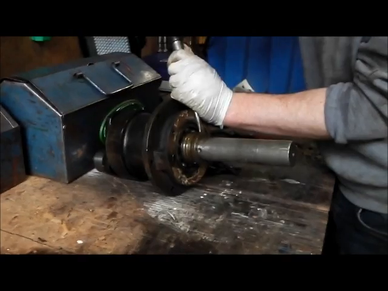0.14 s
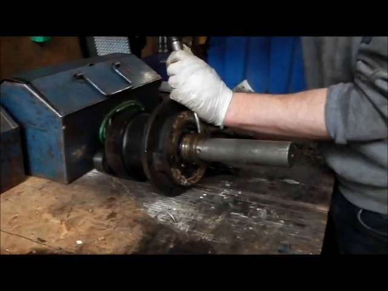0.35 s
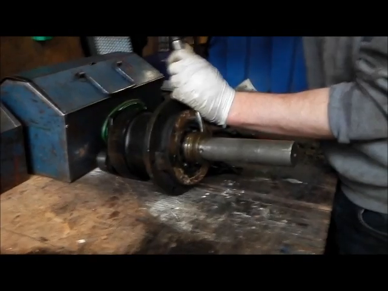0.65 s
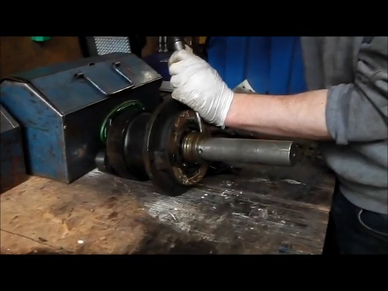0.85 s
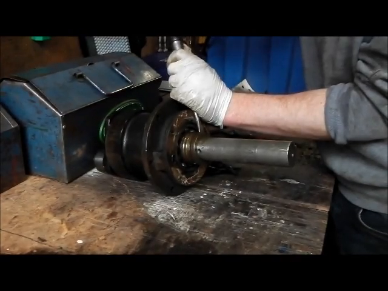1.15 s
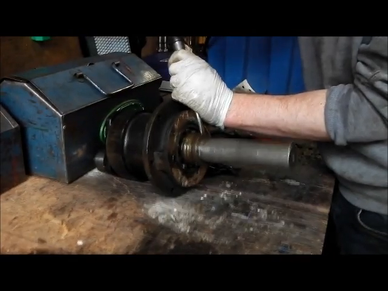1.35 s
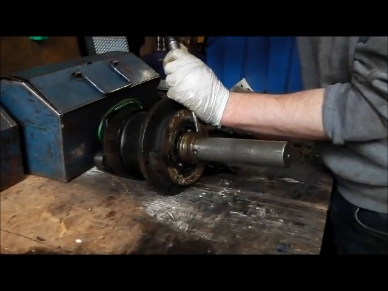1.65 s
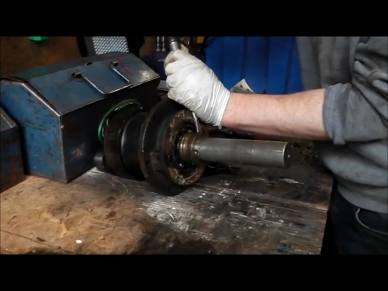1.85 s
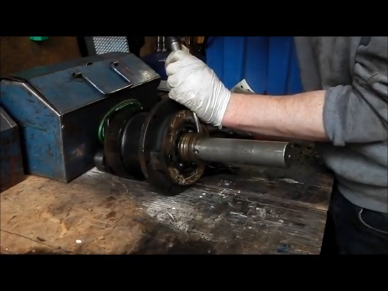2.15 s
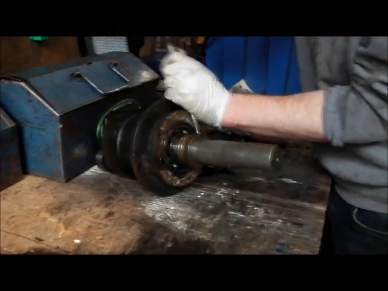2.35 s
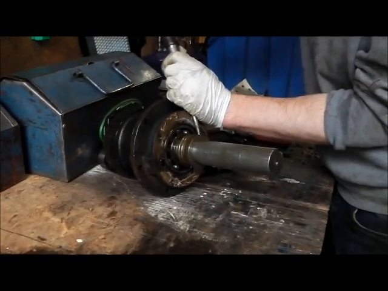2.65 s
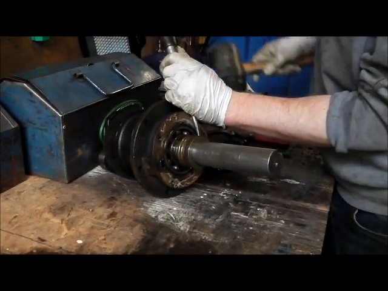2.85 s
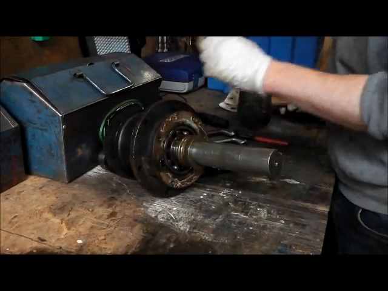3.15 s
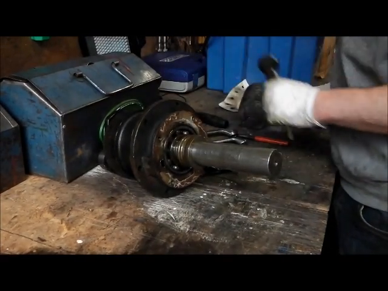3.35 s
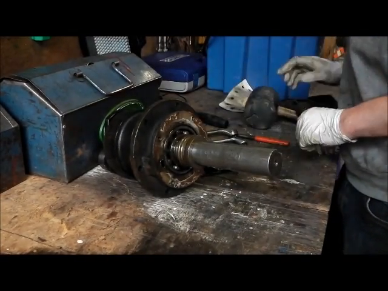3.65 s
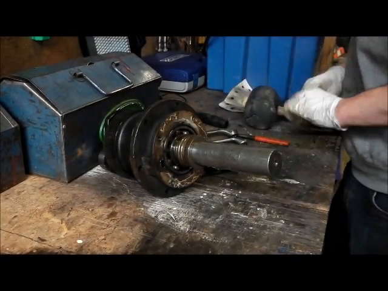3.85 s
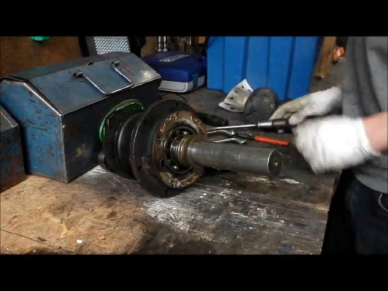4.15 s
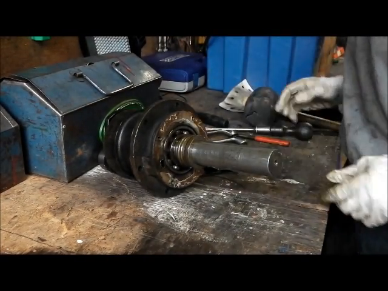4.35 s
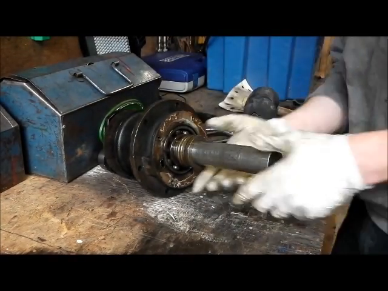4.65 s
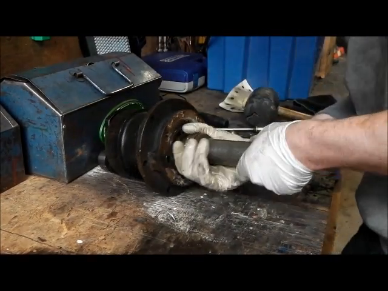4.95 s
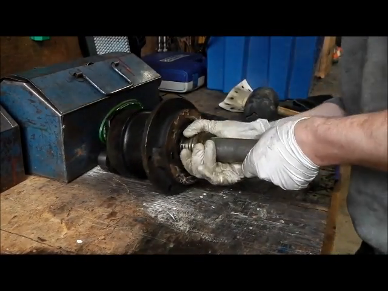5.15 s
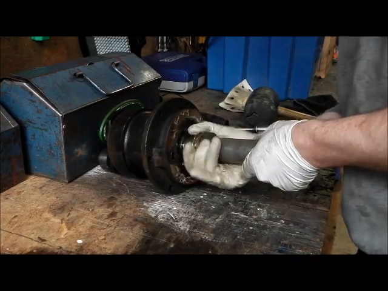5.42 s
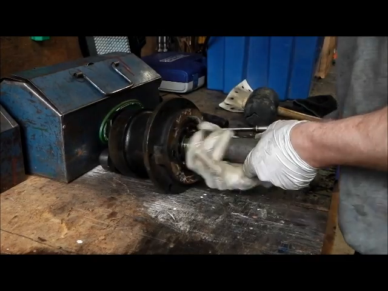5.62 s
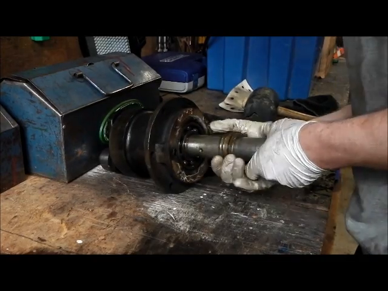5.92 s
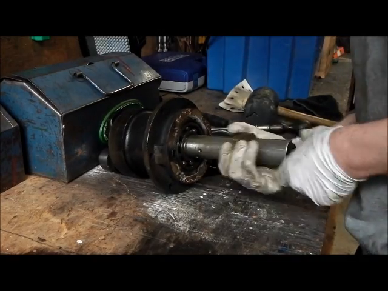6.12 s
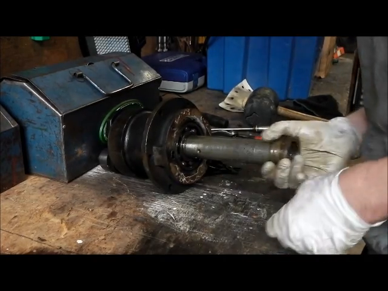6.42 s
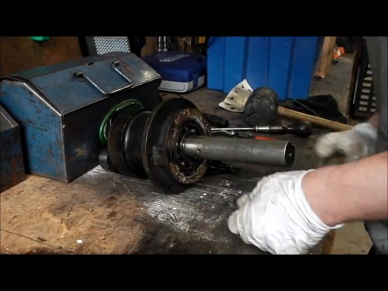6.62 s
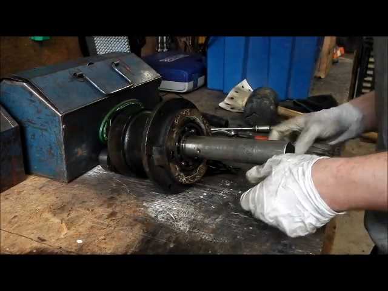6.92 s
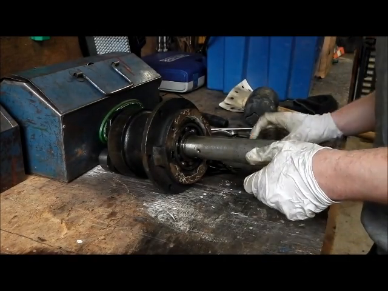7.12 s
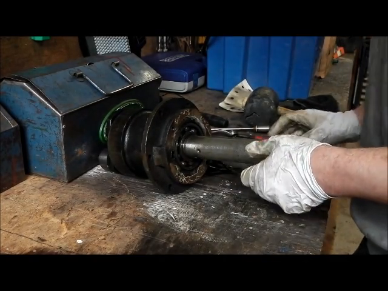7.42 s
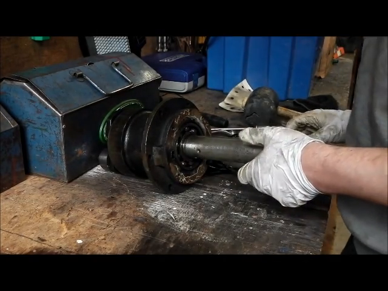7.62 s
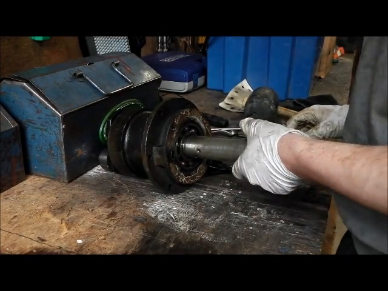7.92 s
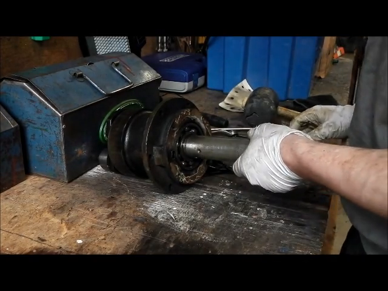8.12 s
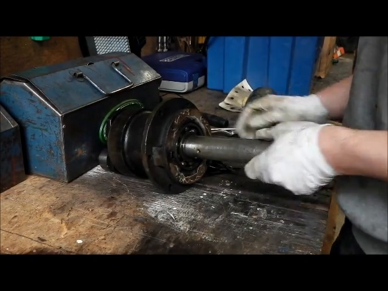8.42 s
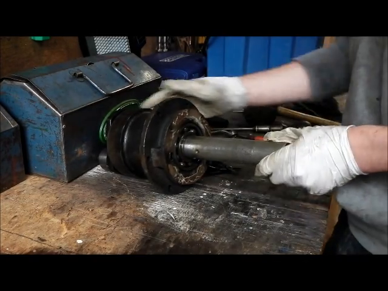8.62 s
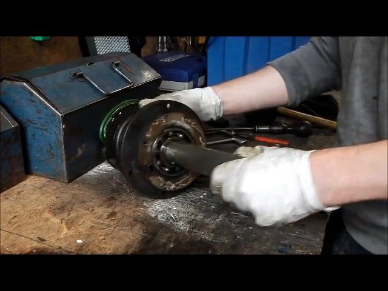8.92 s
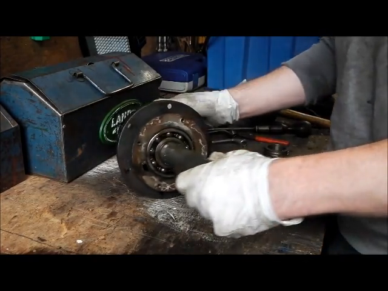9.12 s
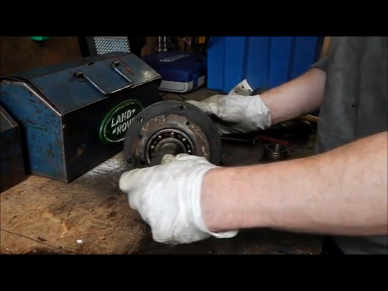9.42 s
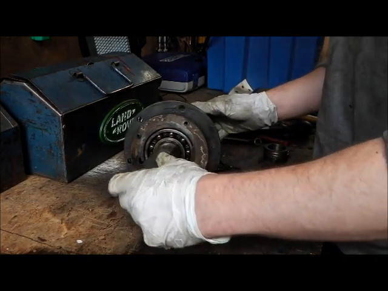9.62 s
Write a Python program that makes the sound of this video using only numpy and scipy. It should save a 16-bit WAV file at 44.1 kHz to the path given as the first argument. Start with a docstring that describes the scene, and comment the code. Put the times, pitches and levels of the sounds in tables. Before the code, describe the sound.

A close stereo microphone in a workshop hears a constant low mains hum and a soft fan rush with a faint whine. Mallet blows on a chisel crack against a steel hub at about 0.0, 0.3, 0.6, 1.4 and 2.3 s, each a quick clatter of seating, strike and two rebounds, with short ringing, loose-part rattle and a low bench boom; the hardest distort. Small knocks fall between them, one sharper at 2.4. From 3.3 to 4.3 tools are laid down with dull thuds, loudest at 3.6 and 4.3. Around 5 to 6 sleeves brush, grit scrapes and small clicks sound as the collar loosens. It slides off at 6.1 to 6.6 with a grainy hiss and thin high squeals. At 7.3 it lands with a bright ringing knock. After a quiet spell, cloth rustles at 8.5, then the flange rumbles and grinds over the boards from 8.8 to 9.6, bumping and jingling.

```python
"""Over mains hum and a fan, a mallet drives a chisel against the collar of a steel axle hub on a workbench.
Five clattering blows crack, ring and rattle the steel and boom through the wooden top; the hardest ones clip.
Between and after them tools knock on the bench; then sleeves brush, grit scrapes, and the collar slides off
with a hiss and thin squeals. It is dropped too, and the hub's flange rumbles round on the boards.
Noise is coloured by frequency curves; steel and bench are sums of decaying sines."""
import sys
import numpy as np
from scipy import signal
from scipy.fft import rfft, irfft, next_fast_len
from scipy.io import wavfile
from scipy.ndimage import uniform_filter1d, map_coordinates

SR = 44100
rng = np.random.default_rng(int(sys.argv[2]) if len(sys.argv) > 2 else 0)


def pcm_store(signal):
    """Save signal as 16-bit PCM."""
    levels = np.round(np.clip(np.atleast_2d(signal), -1, 1) * 32767)
    wavfile.write(sys.argv[1], SR, levels.astype(np.int16).T)


N = 430857
TIME = np.arange(N) / SR  # the whole scene, seconds
AGE = np.arange(SR * 2 // 3) / SR  # seconds since a contact
LOADED_HZ = 94.6  # the bench top's pitch under the hub's weight

# Mallet blows: the chisel seats, strikes and rebounds twice; the hub thumps the bench and rocks back.
# Each row: blow in seconds, its relative level in dB, seating lead in seconds, seating level in dB,
# first and second rebound levels in dB, thump level in dB, delay of the rocking in seconds, its level in dB.
BLOWS = [(0.030, 2, .030, -2, -16, -20.5, -12, 0.16, -29),
         (0.291, -0.5, 0.015, -12, -0.5, -12, -24, 0.05, -13.5),
         (0.602, 5, 0.017, -8, -2, -7, -23.5, 0.091, -27), (1.438, 4, .015, -8, -1.5, -5, -20, .12, -31),
         (2.319, 6, 0.015, -0.5, -1.5, -4.5, -20.5, 0.21, -14.5)]
# Tools and parts knocking on the bench. Each row: start in seconds, relative level in dB, body resonance
# in Hz, corner above which it is dull in Hz, relative room level in dB, thump level in dB, thump pitch in Hz.
KNOCKS = [(1.067, -30, 480, 1000, -9, -28, 98.5), (1.888, -34.5, 432, 615, -12, -23, 100),
          (2.438, -11, 566, 7400, -9, -15.5, 102.3), (3.26, -21.5, 333, 474, -12.5, -15, 105.5),
          (3.479, -35.5, 393, 647, -5.5, -22, 105.5), (3.638, -6.5, 474, 1220, -11.5, -15.5, 132),
          (4.214, -16.5, 780, 1200, -8, -23.5, 113), (4.246, -28, 800, 1690, -10, -35, 107),
          (4.277, -1.5, 1200, 2350, -11.5, -23, 118), (5.184, -26, 600, 4465, -12, -33, 132),
          (5.376, -36, 405, 2530, -15, -46, 103), (5.653, -14.5, 2400, 3520, -11, -19.5, 104),
          (5.73, -27, 2400, 2980, -26, -22.5, 98.5), (5.917, -23, 964, 2820, -8, -22.5, 104),
          (6.042, -23.5, 420, 945, -13.5, -30.5, 133), (7.262, -13.5, 1080, 2000, -23, -40, 109),
          (7.283, -4.5, 1500, 3320, -4, -26, 108), (8.808, -28, 1080, 4550, -9, -58, 99),
          (8.932, -28.5, 3320, 8050, -17, -51, 99.5), (9.132, -22, 417, 3500, -14, -24, 99),
          (9.139, -18, 380, 600, -17, -18, 103), (9.299, -18, 2190, 6000, -12, -30, 101)]
# Likeness of left and right for close sounds. Each row: frequency in Hz, correlation from -1 to 1.
ALIKE = [(40, -0.041), (150, 0.95), (1000, 0.96), (2200, 0.76), (4200, 0.34), (6000, 0.15), (10000, -0.46),
         (15000, -.2)]
# Likeness of left and right for fan and cloth. Each row: frequency in Hz, correlation from -1 to 1.
FAN_ALIKE = [(100, -0.17), (700, 0.89), (2000, 0.75), (4000, 0.28), (6000, -0.02), (15000, -0.1)]


def amp(db):
    """Decibels to gain."""
    return 10 ** (np.asarray(db) / 20)


def unit(x):
    """Scale to rms 1."""
    return x / np.sqrt(np.mean(x ** 2) + 1e-20)


def along(points, hz):
    """Read a curve of (Hz, value) points on a log frequency axis."""
    f, v = np.transpose(points)
    return np.interp(np.log(hz + 1), np.log(f), v)


def fade(t, t60):
    """Free decay: a thousandth is left after t60 seconds."""
    return np.exp(-np.log(1000) * t / t60)


def wobble(rate):
    """A smooth random curve with rate knots a second."""
    knots = rng.standard_normal(int(N * rate / SR) + 4)
    return map_coordinates(knots, [TIME * rate], order=2)


def filtered(x, response):
    """Shape the spectrum of x by a gain that depends on frequency."""
    size = x.shape[-1]
    padded = next_fast_len(size + 2048)
    spectrum = rfft(x, padded) * response(np.fft.rfftfreq(padded, 1 / SR))
    return irfft(spectrum, padded)[..., :size]


def spread(two, gain, alike):
    """Turn two unrelated signals into a coloured left-right pair of rms 1."""
    def response(hz):
        turn = np.arccos(np.clip(along(alike, hz), -1, 1)) / 2
        return gain(hz) * np.array([np.cos(turn), np.sin(turn)])
    mid, side = filtered(two, response)
    return unit(np.array([mid + side, mid - side]))


def rush(spectrum, alike, grain_db=0):
    """Lasting stereo noise; grain_db breaks it into tiny catches."""
    catches = amp(grain_db * wobble(300)) if grain_db else 1
    noise = rng.standard_normal((2, N)) * catches
    return spread(noise, lambda hz: amp(along(spectrum, hz)), alike)


def add(track, s, sound):
    """Mix a sound into the track at time s in seconds."""
    part = track[:, max(round(s * SR), 0):][:, :len(AGE)]
    part += sound[..., :part.shape[1]]


def contact_point():
    """Each spot that is struck favours resonances of its own: random (Hz, dB) peaks and dips."""
    hz = np.geomspace(300, 16000, 56)
    return np.transpose([hz, 2.4 * rng.standard_normal(len(hz))])


def impact(gain, t60, room_db, build):
    """A short noisy clack, then the workshop's answer building up and dying band by band."""
    # Reverberation of the workshop. Each row: frequency in Hz, t60 in seconds.
    room_t60 = [(100, 0.59), (400, 0.34), (1500, 0.41), (4000, 0.35), (8000, 0.39), (15000, 0.56)]
    spot = contact_point()
    colour = lambda hz: gain(hz) * amp(along(spot, hz))
    clack = spread(rng.standard_normal((2, len(AGE))), colour, ALIKE) * fade(AGE, t60)
    answer = spread(rng.standard_normal((2, len(AGE))), colour, ALIKE)
    hz, t, bands = signal.stft(answer, SR, nperseg=256)
    dying = bands * fade(t, along(room_t60, hz)[:, None])
    tail = signal.istft(dying, SR, nperseg=256)[1][:, :len(AGE)]
    attack = 1 - np.exp(-AGE / 0.00095)
    build_up = 1 - np.exp(-(AGE / build) ** 2)
    return clack * attack + amp(room_db) * tail * build_up


def ring(modes, scatter_db, width_hz):
    """Steel modes at new strengths for each contact; in the echoing room every pitch wavers and blurs a little."""
    hz, db, t60 = np.transpose(modes)[:, :, None]
    size, phase, skew = rng.standard_normal((3, len(modes), 1))
    swing = amp(db + scatter_db * size) * fade(AGE, t60)
    # a random walk of the phase blurs each pitch
    drift = np.cumsum(rng.standard_normal(swing.shape), axis=1) * np.sqrt(2 * np.pi * width_hz / SR)
    wave = swing * np.exp(1j * (2 * np.pi * (hz * AGE + phase) + drift))
    # high modes reach left and right out of step
    turn = np.sign(skew) * np.arccos(np.clip(along(ALIKE, hz), -1, 1)) / 2
    mid = np.sum(np.cos(turn) * wave.imag, 0)
    side = np.sum(np.sin(turn) * wave.real, 0)
    return np.array([mid + side, mid - side]) * (1 - np.exp(-AGE / 0.00061))


def stroke(middle, length, order=2):
    """A hand movement swells and dies away; a higher order holds it steady in the middle."""
    return np.exp(-np.minimum(np.abs(2 * (TIME - middle) / length), 10) ** order)


def strokes(rows):
    """Gain per sample from rows of middle and length in seconds and level in dB."""
    return sum(amp(db) * stroke(middle, length) for middle, length, db in rows)


def contacts():
    """Every blow is four contacts of the chisel: (s, level dB, brightness dB per octave, room dB)."""
    # Seating, blow, first and second rebound. Each row: brightness in dB per octave, relative room level in dB.
    colours = [(-1, -16.5), (-0.02, -9.5), (0, -6.5), (-1.5, -2)]
    flight = .0355  # seconds the chisel is off the steel between rebounds
    rows = []
    for s, db, lead, seat_db, first_db, second_db, *_ in BLOWS:
        touches = [(s - lead, seat_db), (s, db), (s + flight, first_db), (s + 2 * flight, second_db)]
        rows += [(*touch, *colour) for touch, colour in zip(touches, colours)]
    return rows


def thumps():
    """Every blow, knock and bump shakes the bench top: (s, level dB, pitch Hz)."""
    # Soft bumps of hands and tools that only move the bench top. Each row: start in seconds, relative level in dB.
    bumps = [(0.425, -20), (3.330, -23.5), (3.51, -22.5), (3.674, -18.5), (3.864, -25), (4.097, -30.5),
             (4.659, -30), (5.285, -32.5), (5.359, -25.5), (5.693, -17.5)]
    free_hz = 106.7  # the bench top without the hub's weight
    rows = [(s, db, hz) for s, *_, db, hz in KNOCKS]
    rows += [(s, db, free_hz) for s, db in bumps]
    for s, *_, thump_db, after, rock_db in BLOWS:
        rows += [(s, thump_db, LOADED_HZ), (s + after, rock_db, LOADED_HZ)]
    return rows


def hum_and_rumble():
    """A 100 Hz mains hum over low noise; both sink briefly after each clear thump."""
    # Colour of the low noise. Each row: frequency in Hz, relative level in dB.
    rumble_colour = [(20, 10), (55, -15), (80, 7), (125, 2.5), (200, -35), (400, -42)]
    dip_s, dip_db, clear_db = 0.25, 7, -33  # length, depth of the hum's dip, thump level that causes one
    after_thump = np.any([(TIME >= s) & (TIME < s + dip_s) for s, db, _ in thumps() if db > clear_db], axis=0)
    sunk = uniform_filter1d(1. * after_thump, SR // 30)
    hum = amp(-38.5 - dip_db * sunk + 0.33 * wobble(6.6)) * np.sin(2 * np.pi * 100 * TIME)
    return hum + amp(-48.0 - 1.3 * sunk) * rush(rumble_colour, ALIKE)


def fan():
    """A fan's steady rush of air noise with a thin whine, unsteady in level and phase."""
    # Colour of the rush. Each row: frequency in Hz, relative level in dB.
    air_colour = [(88, -48), (150, -9), (254, -15), (280, -21), (383, -10), (414, -11.5), (577, -9.5),
                  (788, -11), (852, -6.5), (940, -8.5), (1470, -9), (5130, -11.5), (7890, -22.5),
                  (9040, -24.5), (15900, -33.5)]
    whine = amp(-54.5 + 0.51 * wobble(12)) * np.sin(2 * np.pi * 834 * TIME + 0.86 * wobble(6.2))
    return whine + amp(-42.0) * rush(air_colour, FAN_ALIKE)


def mallet():
    """Each contact of the chisel cracks against the hub and sets its steel modes ringing."""
    # Colour of the crack. Each row: frequency in Hz, relative level in dB.
    steel = [(40, -3), (230, -11.5), (420, -2), (700, 0), (1400, -7.5), (2200, -2), (4400, -6),
             (6500, -13.5), (9000, -20), (15000, -34.5)]
    # Modes of hub and shaft. Each row: frequency in Hz, relative level in dB, t60 in seconds.
    hub = [(403, -5.5, 0.51), (545, -7, 0.39), (655, 2, 0.26), (773, -9, 0.35), (1108, -8.5, 0.44),
           (1302, -7, 0.35), (1630, -9.5, 0.44), (1733, -9, 0.29), (1902, 5, 0.2), (1912, -1, 0.31),
           (2159, -2.5, 0.34), (2595, -8.5, 0.48), (2784, -15, 0.57), (3120, -14, 0.51),
           (3340, -19.5, 0.53), (4050, -14, 0.7), (4430, 3, 0.11), (4410, -3.5, .27), (4500, -24, 1),
           (4700, -23, 0.84), (5650, -3.5, 0.19), (10500, -9, 0.15)]
    out = np.zeros((2, N))
    for s, db, bright_db, room_db in contacts():
        # brightness tilts the spectrum about 2 kHz
        colour = lambda hz: amp(along(steel, hz) + bright_db * np.log2(np.maximum(hz, 400) / 2000))
        clack = impact(colour, t60=0.056, room_db=room_db - 3.0, build=0.019)
        ringing = ring(hub, scatter_db=4, width_hz=17.0)
        add(out, s, amp(db) * (amp(-5.0) * clack + amp(-22.5) * ringing))
    return out


def rattle():
    """After each hard contact the loose parts chatter: four ticks, each with a short ping of its own."""
    out = np.zeros((2, N))
    for s, db, *_ in contacts():
        draws = rng.random((4, 3))
        if db <= -7:  # too soft to shake the parts
            continue
        for delay, pitch, size in draws:
            hz = 1600 * 4 ** pitch
            lag = rng.standard_normal((2, 1)) * hz / 4000  # shrill pings reach left and right out of step
            ping = np.sin(2 * np.pi * hz * AGE + lag) * fade(AGE, 0.046) * (1600 / hz) ** 0.67
            tick = rng.standard_normal((2, len(AGE))) * fade(AGE, 0.0087)
            gain = amp(db - 14 - 6.4 * delay - 2.8 * size)
            add(out, s + 0.013 + 0.085 * delay, gain * (ping + amp(-5.5) * tick))
    return out


def lobes(count):
    """High spots of the rolling flange bump the bench at an even pace: (s, level dB, pitch Hz)."""
    start_s, gap_s, level_db = 9.004, 0.07, -23  # level relative to the other thumps
    return [(start_s + k * gap_s, level_db, LOADED_HZ) for k in range(count)]


def bench():
    """The bench top swells into one low, quickly damped mode with a weak overtone."""
    out = np.zeros((2, N))
    for s, db, hz in thumps() + lobes(count=5):
        mode = np.sin(2 * np.pi * hz * AGE) * fade(AGE, 0.14)
        overtone = np.sin(2 * np.pi * 1.44 * hz * AGE) * fade(AGE, 0.13)
        swell = 1 - np.exp(-(AGE / 0.0087) ** 2)
        add(out, s - .003, amp(db + 8.0) * (mode + amp(-11.0) * overtone) * swell)
    return out


def knocks():
    """Things land on the wooden top, each with a body resonance; the softer the contact, the duller the knock."""
    # Colour of the wood. Each row: frequency in Hz, relative level in dB.
    wood = [(25, -6), (130, -12.5), (240, 0.5), (310, -3.5), (420, 3.5), (1100, 1), (1700, -2), (2600, 3),
            (4200, -2), (7000, -6), (15000, -21)]
    out = np.zeros((2, N))
    for s, db, body_hz, dull_hz, room_db, *_ in KNOCKS:
        body = lambda hz: 1 + 1 / (1 + ((hz - body_hz) / (0.29 * body_hz)) ** 2)
        softness = lambda hz: 1 / np.sqrt(1 + (hz / dull_hz) ** 4)
        colour = lambda hz: amp(along(wood, hz)) * body(hz) * softness(hz)
        add(out, s, amp(db + 3) * impact(colour, t60=0.068, room_db=room_db + 0.5, build=0.022))
    return out


def sleeves():
    """Sleeves and gloves brush past: soft swells of grainy cloth noise."""
    # Colour of the cloth. Each row: frequency in Hz, relative level in dB.
    cloth = [(200, -7), (1000, -19), (4000, 1.5), (6500, -2), (11000, -5), (15500, -12)]
    # Brushing movements. Each row: middle in seconds, length in seconds, level in dB.
    brushes = [(3.55, .12, -47), (3.92, 0.094, -44.5), (4.17, 0.17, -47), (4.87, .19, -41),
               (5.09, 0.16, -40.5), (5.33, 0.18, -43.5), (5.76, 0.2, -34), (5.97, 0.12, -44),
               (6.14, 0.2, -40.5), (7.92, 0.17, -49.5), (8.48, 0.27, -41.5), (8.92, 0.12, -40.5),
               (9.31, 0.21, -37)]
    return strokes(brushes) * rush(cloth, FAN_ALIKE, grain_db=2.5)


def rolling():
    """How hard the hub's flange rolls on the boards, as a gain per sample."""
    # Course of the roll. Each row: time in seconds, level in dB.
    course = [(8.72, -78), (8.83, -46), (8.97, -39), (9.05, -37.5), (9.13, -32), (9.2, -34.5),
              (9.31, -26.5), (9.38, -33.5), (9.49, -32.5), (9.6, -49), (9.77, -71)]
    gain = amp(np.interp(TIME, *np.transpose(course)))
    return gain * (TIME > course[0][0])


def grit():
    """Grit grinds under steel as the collar is worked loose, and again under the rolling flange."""
    # Colour of the grinding. Each row: frequency in Hz, relative level in dB.
    grit_colour = [(25, -37), (100, 15), (200, -7.5), (450, 0.5), (1000, -4), (1700, -7), (2700, -2),
                   (3900, -9.5), (5800, -6), (9000, -26), (15000, -31)]
    # Scrapes of the collar. Each row: middle in seconds, length in seconds, level in dB.
    scrapes = [(5.0, 0.037, -37), (5.09, 0.094, -30.5), (5.4, 0.27, -44.5), (5.74, 0.11, -33),
               (6.45, 0.15, -41.5)]
    under_flange = amp(-3) * rolling()
    return (strokes(scrapes) + under_flange) * rush(grit_colour, ALIKE, grain_db=3.0)


def race_jingle():
    """The loose bearing race jingles in its steel modes when the hub is moved."""
    # Modes of the race. Each row: frequency in Hz, relative level in dB, t60 in seconds.
    race = [(2143, 0, 0.29), (2500, 0, 0.35), (3900, -16, 0.15), (4920, 2.5, 0.21), (5540, 5, 0.23),
            (6000, 9, 0.11), (5920, -4.5, 0.45), (7000, -6, 0.45), (8660, 5.5, 0.1), (9000, -14, .25),
            (11800, -10, .25), (12760, -14, 0.28)]
    # Jingles. Each row: start in seconds, relative level in dB.
    clinks = [(5.182, -43.5), (9.132, -37), (9.258, -22), (9.300, -24), (9.455, -38.5)]
    out = np.zeros((2, N))
    for s, db in clinks:
        add(out, s, amp(db - 7.5) * ring(race, scatter_db=4.5, width_hz=35))
    return out


def collar_ping():
    """The collar rings in a few steel modes where it meets steel or wood."""
    # Modes of the collar. Each row: frequency in Hz, relative level in dB, t60 in seconds.
    collar = [(1085, -2, 0.18), (1510, -9, 0.21), (3530, 20.5, 0.02), (10300, -13, 0.27)]
    # Hits on the collar. Each row: start in seconds, relative level in dB.
    hits = [(5.653, -39), (5.916, -39), (7.262, -43), (7.283, -17.5), (8.808, -40)]
    out = np.zeros((2, N))
    for s, db in hits:
        add(out, s, amp(db) * ring(collar, scatter_db=3.0, width_hz=33))
    return out


def squeal(hz):
    """Steel sticking and slipping on steel: a fuzzy line that wanders in pitch and level."""
    pitch = hz * (1 + 0.022 * wobble(23) + 0.0102 * wobble(830))  # slow wander, fast fuzz
    cycles = np.cumsum(pitch) / SR + rng.random((2, 1))
    return amp(-53.5 + 2.5 * wobble(25)) * np.sin(2 * np.pi * cycles)


def collar_slide():
    """The collar runs along the shaft with a grainy hiss and thin squeals."""
    # Colour of the hiss. Each row: frequency in Hz, relative level in dB.
    hiss_colour = [(400, -18), (3000, -5.5), (4200, -8), (7500, -11), (8400, 4.5), (9300, -17), (10700, 2),
                   (12000, -22), (16000, -24)]
    # Pitches of the squeals in Hz.
    squeals_hz = [8400, 10650]
    hiss = amp(-41.5) * rush(hiss_colour, ALIKE, grain_db=3.0)
    sliding = hiss + sum(squeal(hz) for hz in squeals_hz)
    return stroke(middle=6.36, length=0.46, order=6) * sliding


def flange():
    """The hub's flange rumbles on the boards: low grainy noise that follows the roll."""
    # Colour of the boards. Each row: frequency in Hz, relative level in dB.
    boards = [(50, -30), (110, 19), (180, -10.5), (255, -7), (310, -8), (420, 2), (700, -3.5), (1200, -4),
              (2500, -14), (8000, -48)]
    return rolling() * rush(boards, ALIKE, grain_db=2.0)


def scene():
    """Everything on the bench, heard from close by, with a slight left-right lean in each band."""
    # Lean of the stereo image. Each row: frequency in Hz, left over right in dB.
    lean = [(50, -1.5), (1200, -1.6), (2500, .3), (5000, 1.4), (14000, 0)]
    sound = hum_and_rumble() + fan() + mallet() + rattle() + bench() + knocks()
    sound += sleeves() + grit() + race_jingle() + collar_ping() + collar_slide() + flange()
    return filtered(sound, lambda hz: amp(np.array([[.5], [-.5]]) * along(lean, hz)))


def record(dry):
    """The close microphone has a narrow treble notch, clips at full scale and keeps nothing above 15.9 kHz."""
    # Microphone response. Each row: frequency in Hz, gain in dB.
    mic = [(25, -12), (60, 1), (6800, 1), (7500, -1.5), (7900, -10.5), (8300, -0.5), (9000, 2)]
    clipped = np.clip(filtered(dry, lambda hz: amp(along(mic, hz))), -1, 1)
    return filtered(clipped, lambda hz: hz < 15900)


dry = scene()
out = record(dry)
pcm_store(out)
```